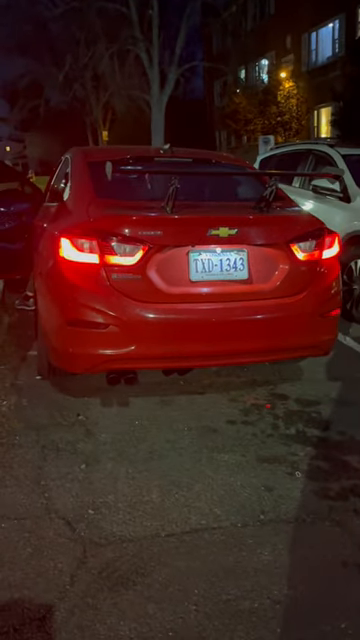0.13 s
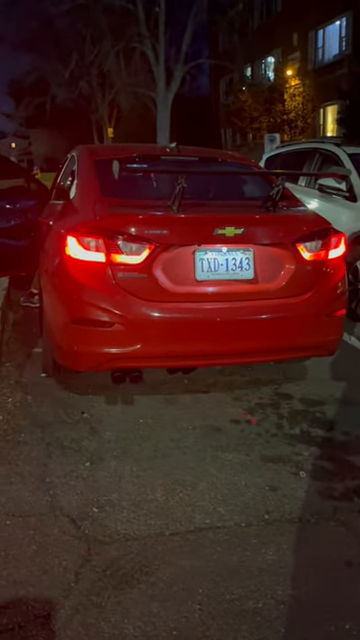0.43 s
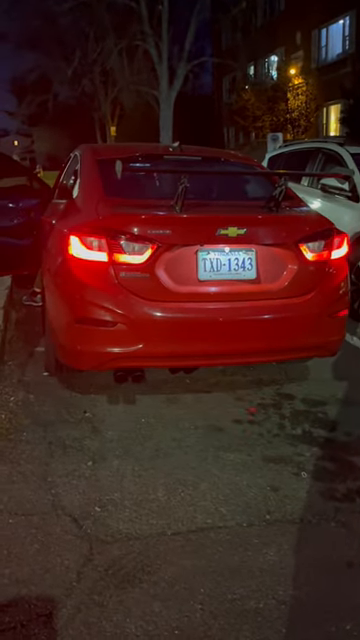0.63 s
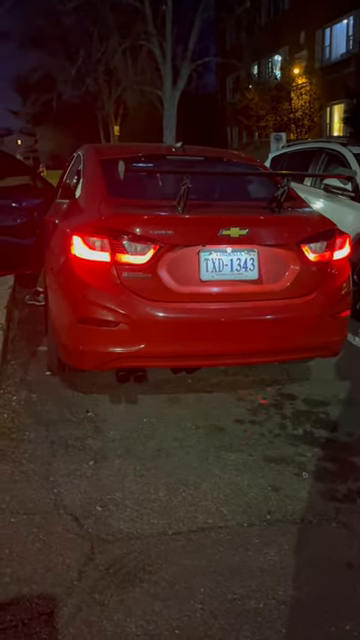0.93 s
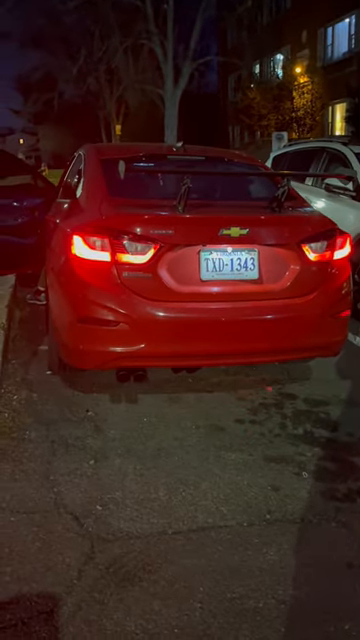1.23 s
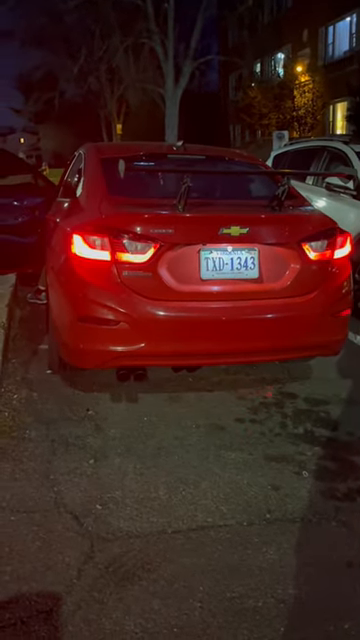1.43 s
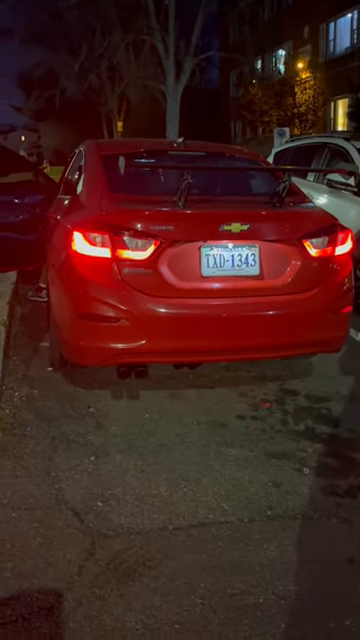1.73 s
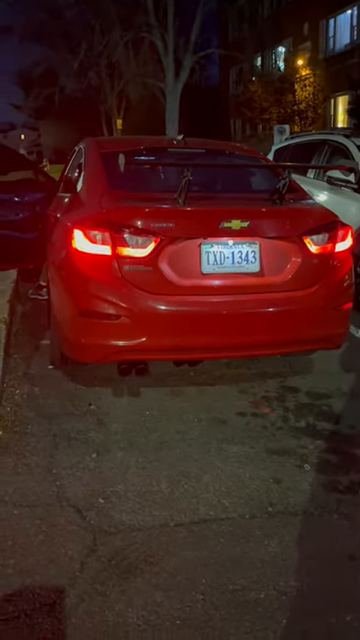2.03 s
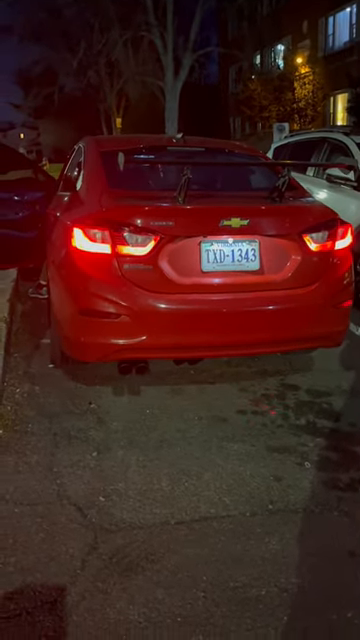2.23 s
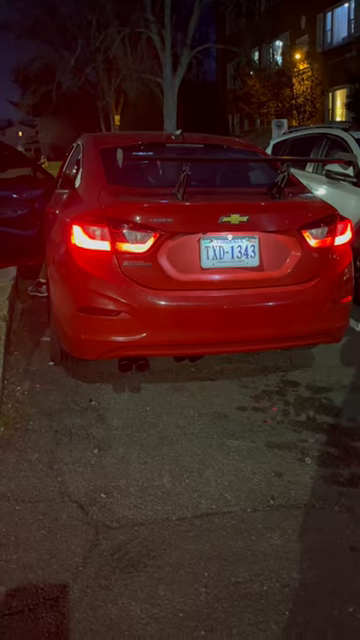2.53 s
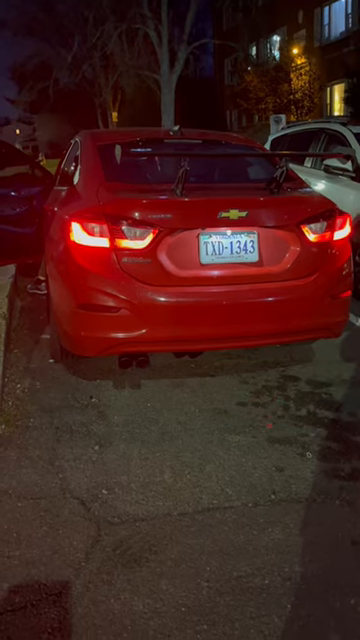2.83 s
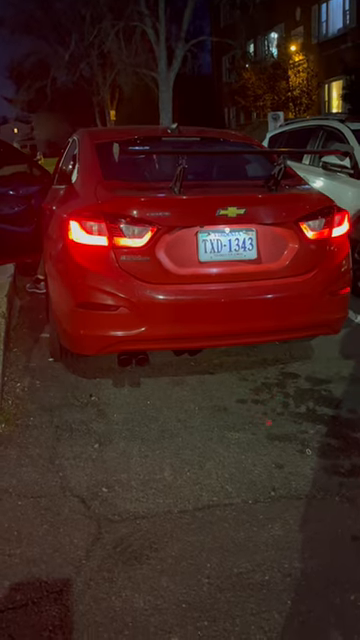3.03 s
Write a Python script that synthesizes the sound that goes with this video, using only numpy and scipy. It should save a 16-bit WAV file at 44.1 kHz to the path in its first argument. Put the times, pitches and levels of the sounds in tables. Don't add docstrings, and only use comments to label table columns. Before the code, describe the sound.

Car exhaust: low idle drone, a quick raspy blip, then an uneven crackling fall in pitch.

```python
import sys
import numpy as np
from scipy import signal
from scipy.fft import rfft, irfft
from scipy.io import wavfile
from scipy.ndimage import uniform_filter1d, map_coordinates

SR = 44100
rng = np.random.default_rng(int(sys.argv[2]) if len(sys.argv) > 2 else 0)


def pcm_store(signal):
    levels = np.round(np.clip(np.atleast_2d(signal), -1, 1) * 32767)
    wavfile.write(sys.argv[1], SR, levels.astype(np.int16).T)


def voltage_ratio(level):
    return 10 ** (np.asarray(level, float) / 20)


N = 141120
LEAD = 8192

# time in seconds, firing rate in Hz, boom in dB, rasp in dB.
ENGINE_RUN = [(0.0, 58.5, -16, -53.5), (0.04, 58.5, -21, -67), (0.2, 62, -16.5, -48.5),
              (0.21, 62.08, -12.5, -42), (0.39, 92.52, -8, -34), (0.46, 100.1, -13.5, -34),
              (0.61, 106.5, -20.5, -42.5), (0.78, 104.8, -22.5, -47), (1.13, 91.05, -13, -48),
              (1.46, 83.97, -19, -56.5), (1.64, 74.18, -16.5, -54.5), (1.68, 76.12, -18.5, -57),
              (1.86, 73.76, -18.5, -47.5), (2.27, 68.4, -23.5, -52.5), (2.56, 63.1, -16.5, -53.5),
              (2.99, 53.37, -21.5, -57.5), (3.14, 53.5, -21, -56), (3.2, 55.2, -12.5, -47.5)]
# time in seconds, share of misfiring from 0 to 1.
MISFIRING = [(0, 0.09), (.5, 0.2), (.72, 0.07), (.85, 0.2), (1.0, 0.5), (1.22, 0.34), (1.33, 0.5),
             (1.66, .8), (1.76, 0.05), (2.65, 0.02), (2.72, 0.4), (2.85, 0), (3.2, 0.13)]
# time in seconds, depth of the push in dB, its sharpness in dB.
PUSH_SHAPE = [(0, -8, -14), (.18, 0, -4), (.35, -2, 2.2), (.55, -1, 1.5), (.7, -9, -4.5), (.95, -6.5, 4.5),
              (1.2, -16, 1.5), (1.4, -5.5, -1.5), (1.7, 2.5, 2.5), (2.0, -1, 0), (2.3, -2.5, -1),
              (2.55, -7, -1.5), (2.8, -2.5, -7), (3.0, 0, -7.5), (3.2, 6.5, -1)]
# frequency in Hz, width in Hz, level in dB.
PIPE_MODES = [(54, 26, -1.5), (84.3, 14.9, 2), (125.57, 7.1, 5), (161.4, 11.3, 1.5), (185.04, 11.7, 2),
              (245.6, 11, -3), (286.2, 10.4, -2), (350, 17.8, -6.5), (413.4, 54, -17), (491, 40, -15)]
# frequency in Hz, width in Hz, level in dB.
TIP_MODES = [(756, 310, -8), (880, 130, -2.5), (1050, 81, -0.5), (1283, 202, -1), (1500, 236, -2),
             (1808, 300, -11), (2270, 690, -22.5)]
# time in seconds, pitch in Hz, level in dB.
TURBO_GLIDES = [
    [(0.0, 7179, -61.5), (0.006, 7120, -68), (0.128, 7200, -65.5), (0.15, 7389, -102)],
    [(2.55, 7606, -64), (2.642, 7301, -79), (2.746, 6965, -58.5), (2.86, 6699, -93)],
]
# frequency in Hz, density in dB per Hz.
GAS_SPECTRUM = [(1500, 4.5), (2200, 2), (3300, -6.5), (4500, -7.5), (6500, -13), (9000, -13.5),
                (13000, -26), (15600, -26)]
# frequency in Hz, density in dB per Hz.
STREET_SPECTRUM = [(18, -42.5), (30, -13), (156, -11.5), (482, -7.5), (887, -26), (1150, -15.5),
                   (1790, -36), (2500, -42), (3250, -75.5), (5500, -120)]
# time in seconds, thump in dB, push in ms, crack in dB, crack pitch in Hz.
FUEL_POPS = [(.225, -17.5, 4.6, -25.5, 1500), (.8, -13, 3.5, -40.5, 900), (0.864, -11, 2.2, -38.5, 900),
             (1.32, -7, 3.1, -33, 917.4), (1.334, -9.5, 3.8, -40, 804), (1.358, -14, 3.96, -46.5, 806),
             (1.439, -12.5, 2.7, -47.5, 900), (1.487, -28, 3.06, -33, 840), (1.564, -2.5, 5.2, -44, 798.2),
             (1.618, -5, 6, -36.5, 880), (1.72, -9, 5.5, -41, 1050), (2.696, -14, 2.2, -39, 1182),
             (3.17, -33, 3.1, -36, 1288), (3.19, -21, 4.2, -33, 1297)]


def curve(table, col):
    table = np.array(table, float)
    return np.interp(np.arange(N) / SR, table[:, 0], table[:, col])


def unit(x):
    return x / np.sqrt(np.mean(x ** 2))


def steady(x):
    k = int(0.12 * SR)
    power = uniform_filter1d(uniform_filter1d(x ** 2, k), k)
    return x / np.sqrt(power + 1e-12)


def lowpass(x, hz, order=2, steep=False):
    if steep:
        sos = signal.cheby2(order, 30, hz, fs=SR, output="sos")
    else:
        sos = signal.butter(order, hz, fs=SR, output="sos")
    return signal.sosfilt(sos, x)


def ring(x, modes, extra_db=None):
    total = 0
    for k, (hz, width_hz, db) in enumerate(modes):
        extra = 0 if extra_db is None else extra_db[k]
        tone = signal.lfilter(*signal.iirpeak(hz, hz / width_hz, fs=SR), x)[..., -N:]
        total = total + (-1) ** k * voltage_ratio(db + extra) * tone
    return total


def clicks(at_s, size):
    out = np.zeros(N + LEAD + 2)
    at = np.clip(np.asarray(at_s) * SR + LEAD, 0, N + LEAD)
    i = at.astype(int)
    np.add.at(out, i, size * (1 - at + i))
    np.add.at(out, i + 1, size * (at - i))
    return out[:N + LEAD]


def decay(x, tau_s):
    return signal.lfilter([1], [1, -np.exp(-1 / (tau_s * SR))], x)


def coloured(points, channels=2):
    p = np.array(points, float)
    hz = np.arange(N // 2 + 1) * SR / N + 1
    db = np.interp(np.log(hz), np.log(p[:, 0]), p[:, 1], left=-90, right=-90)
    return unit(irfft(rfft(rng.standard_normal((channels, N))) * voltage_ratio(db), N))


def walk(rate):
    k = int(SR / rate)
    held = np.repeat(rng.standard_normal(N // k + 1), k)
    return unit(uniform_filter1d(uniform_filter1d(held, k), k)[:N])


def late(x, s):
    return map_coordinates(x, [np.arange(N) - s * SR], order=1, mode="nearest")


def firings():
    hz = curve(ENGINE_RUN, 1)
    turns = 0.42 + np.cumsum(hz) / SR
    whole = np.arange(-8, int(turns[-1]) + 1)
    before = (whole - turns[0]) / hz[0] * SR
    at = np.where(whole < turns[0], before, np.interp(whole, turns, np.arange(N)))
    i = np.clip(at, 0, N).astype(int)
    uneven = np.clip(curve(MISFIRING, 1)[i], 0, 1)
    timing, boom, spit, push = rng.standard_normal((4, len(whole)))
    at_s = at / SR + (0.0051 + 0.03 * uneven) * timing / hz[i]
    return at_s, voltage_ratio(0.7 * boom), voltage_ratio(2.3 * spit), 1.43 * uneven * push


def pipe(x, extra_db=None):
    spread_hz, muffler_hz = 167, 509
    slope = np.tan(np.pi * spread_hz / SR)
    a = (1 - slope) / (1 + slope)
    x = signal.sosfilt([[-a, 1, 0, 1, -a, 0]] * 4, x)
    x = lowpass(x, 1.073 * muffler_hz, order=10, steep=True)
    return ring(x, PIPE_MODES, extra_db)


def exhaust_boom(at_s, boom, misfire):
    depth, sharp = curve(PUSH_SHAPE, 1), curve(PUSH_SHAPE, 2)
    top = sharp + 0.27 * (curve(ENGINE_RUN, 1) - 90)
    shape_db = []
    for hz, _, _ in PIPE_MODES:
        if hz < 110:
            shape_db.append(depth)
        elif hz > 385:
            shape_db.append(top)
        else:
            shape_db.append(sharp if hz > 210 else 0)
    even = pipe(lowpass(clicks(at_s, boom), 900), shape_db)
    uneven = pipe(lowpass(clicks(at_s, misfire), 248), [0.2 * d for d in shape_db])
    return steady(even + uneven) * voltage_ratio(curve(ENGINE_RUN, 2))


def tip_rasp(at_s, spit, air):
    spits = clicks(at_s, spit)
    gust = unit(decay(spits, 0.0018)) + voltage_ratio(-8)
    blast = gust * air + voltage_ratio(3) * unit(spits) / 2
    rasp_db = curve(ENGINE_RUN, 3)
    bright_db = 0.5 * (rasp_db + 32.5)
    tone = ring(blast, TIP_MODES, [bright_db * (m[0] > 1200) for m in TIP_MODES])
    return steady(lowpass(tone, 2220, order=4)) * voltage_ratio(rasp_db)


def turbo_whistle():
    out = np.zeros(N)
    t = np.arange(N) / SR
    for rows in TURBO_GLIDES:
        rise, fall = t - rows[0][0] + 0.0089, rows[-1][0] - t
        on = np.clip(np.minimum(rise, fall) / 0.023, 0, 1)
        hz = curve(rows, 1) * (1 + 0.002 * walk(40))
        level = voltage_ratio(curve(rows, 2) - 1.0 + 2.5 * walk(30))
        out += on * level * np.sin(2 * np.pi * np.cumsum(hz) / SR)
    return out


def gas_hiss():
    speed = uniform_filter1d(curve(ENGINE_RUN, 1), int(0.05 * SR)) - 55
    throttle = np.maximum(curve(ENGINE_RUN, 3) + 50, 0)
    level_db = -66.5 + 0.1692 * speed + 0.3834 * throttle + 0.53 * walk(33)
    n = coloured(GAS_SPECTRUM, channels=3)
    return (n[:2] + 0.85 * n[2]) * voltage_ratio(level_db)


def burn_flutter():
    noise = coloured([(40, -12.5), (90, -3), (250, -3.5), (420, -3.5), (500, -14.5), (540, -31.5)])
    share = np.clip(curve(MISFIRING, 1), 0, 1)
    return noise * voltage_ratio(-25 + 4 * walk(20)) * np.sqrt(share)


def night_street():
    return voltage_ratio(-46) * coloured(STREET_SPECTRUM)


def fuel_pops():
    push = 0
    for s, db, ms, _, _ in FUEL_POPS:
        start = clicks([s - 0.021], voltage_ratio(db) / ms)
        push = push + np.convolve(start, np.hanning(int(ms * SR / 1000)))[:N + LEAD]
    reference = np.convolve(clicks([0.1], 1 / 4), np.hanning(SR // 250))[:N + LEAD]
    return pipe(push) / np.abs(pipe(reference)).max()


def pop_cracks(air):
    out = 0
    for s, _, _, db, hz in FUEL_POPS:
        snap = clicks([s], 1.)
        burst = 3 * snap + 0.4 * decay(snap, 0.0022) * air
        burst = ring(burst, [(hz, 0.8 * hz, 0)])
        burst = ring(burst, [(hz, 0.4 * hz, 0)])
        out = out + voltage_ratio(db + 4.5) * lowpass(burst, 1.3 * hz, order=3) / np.abs(burst).max()
    return out


def echoes(x):
    t, t60_s = np.arange(int(0.4 * SR)) / SR, 0.3
    tail = rng.standard_normal((2, len(t))) * np.exp(-np.log(1000) * t / t60_s) * (t > 0.006)
    tail = tail / np.sqrt((tail ** 2).sum(axis=1, keepdims=True))
    return voltage_ratio(-21) * signal.fftconvolve(x[None], tail, axes=1)[:, :N]


def scene():
    at_s, boom, spit, misfire = firings()
    air = rng.standard_normal((2, N + LEAD))
    low = exhaust_boom(at_s, boom, misfire) + fuel_pops()
    rasp, wide = tip_rasp(at_s, spit, air) + pop_cracks(air)
    left = voltage_ratio(-0.7) * late(low, 0.00007) + voltage_ratio(-3.5) * late(rasp, 0.00008) + voltage_ratio(-14.5) * wide
    right = low + voltage_ratio(8.0) * rasp
    exhaust = np.array([left, right]) + echoes(low + rasp)
    return exhaust + turbo_whistle() + gas_hiss() + burn_flutter() + night_street()


def band_limit(x):
    return signal.sosfilt(signal.butter(12, 15650, fs=SR, output="sos"), x)


def record(dry):
    x = signal.sosfilt(signal.butter(2, 40, "high", fs=SR, output="sos"), dry)
    x = np.tanh(1.085 * x) / 1.06
    for hz, width_hz in [(5950, 1200), (10400, 1400)]:
        x = signal.lfilter(*signal.iirnotch(hz, hz / width_hz, fs=SR), x)
    return band_limit(x)


dry = scene()
out = record(dry)
pcm_store(out)
```